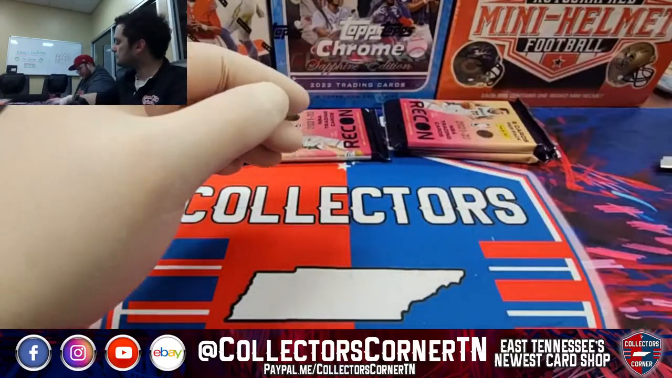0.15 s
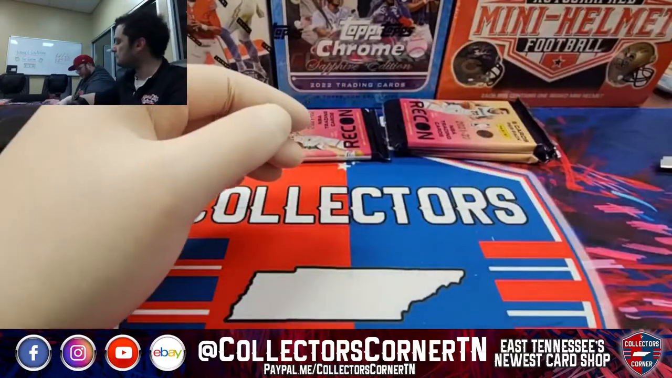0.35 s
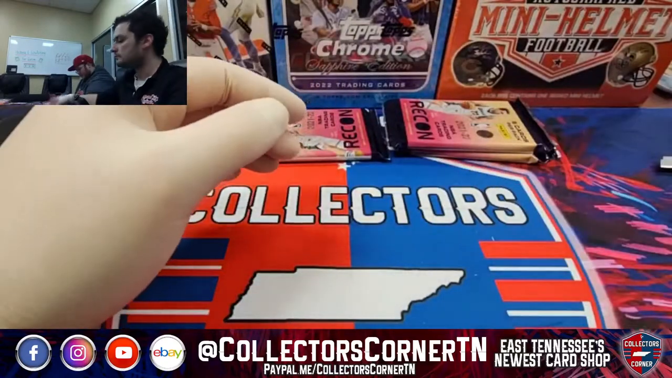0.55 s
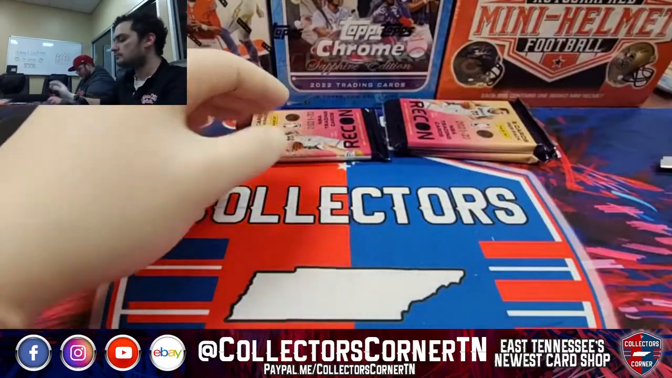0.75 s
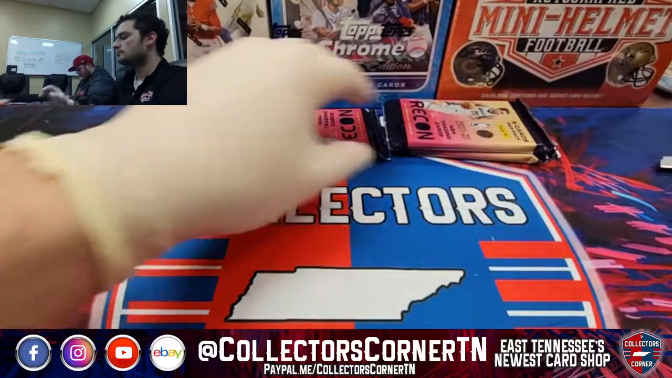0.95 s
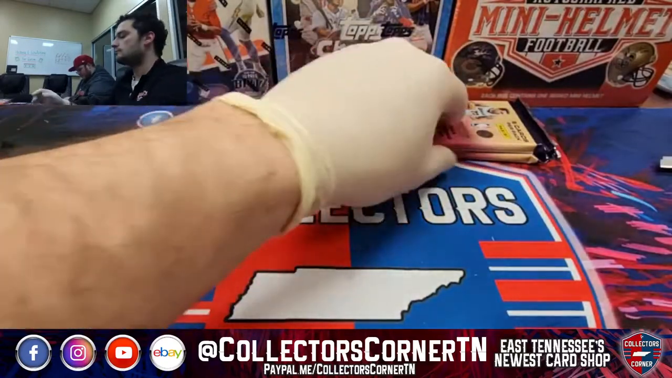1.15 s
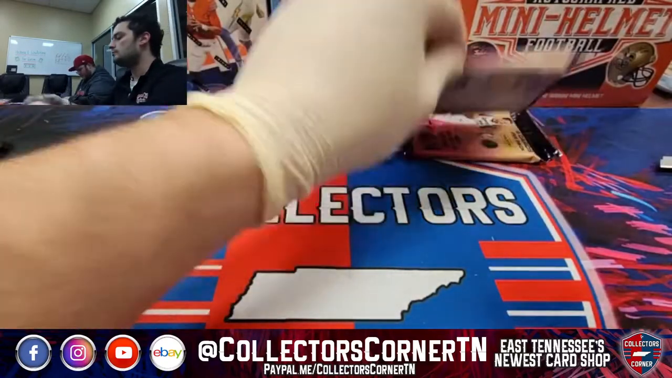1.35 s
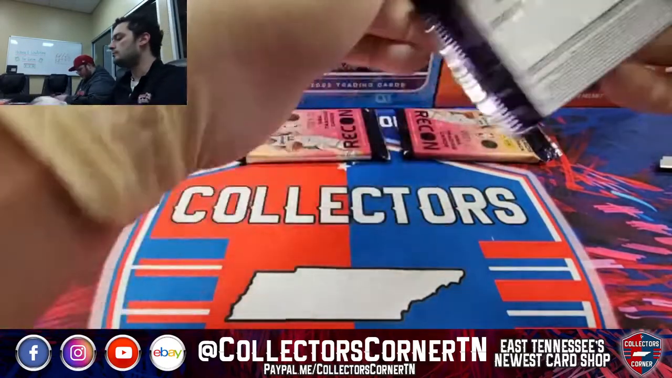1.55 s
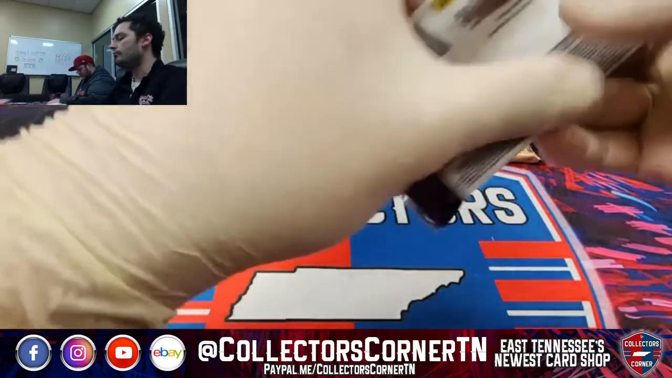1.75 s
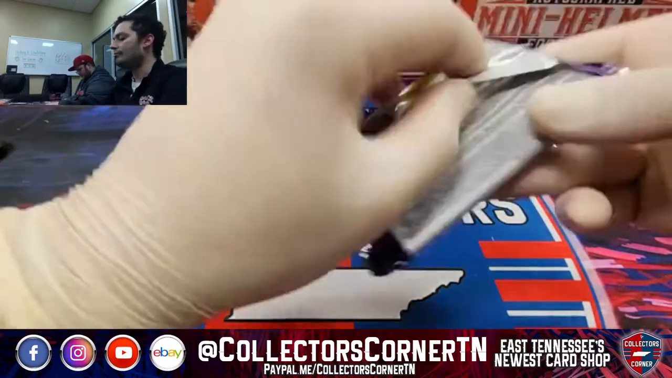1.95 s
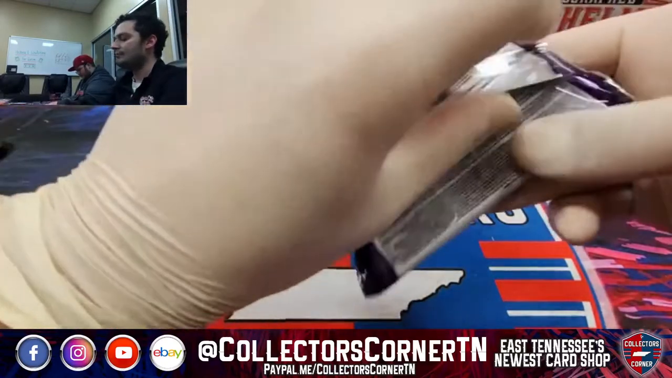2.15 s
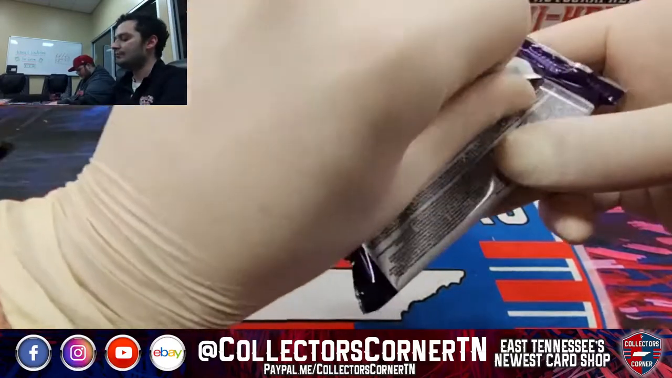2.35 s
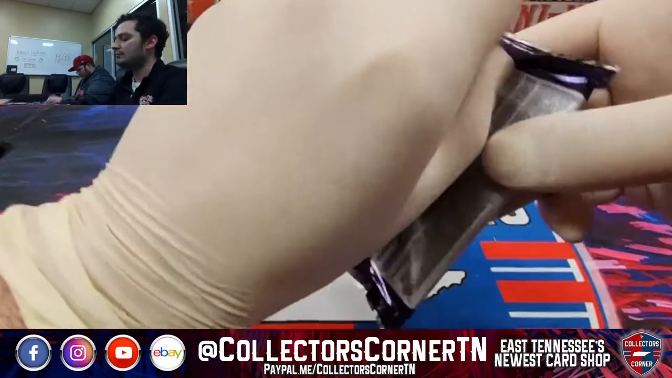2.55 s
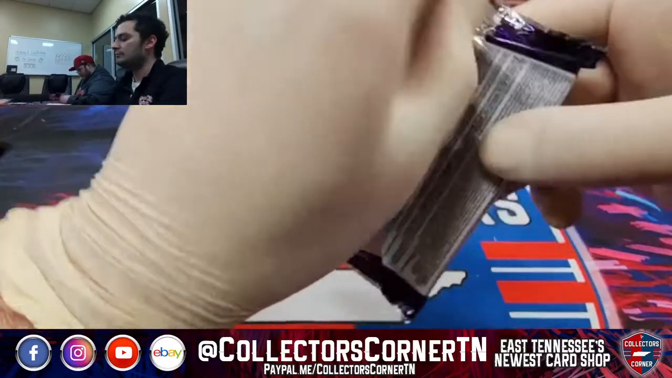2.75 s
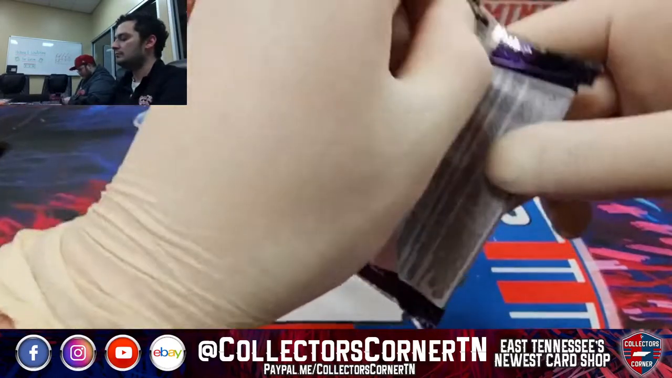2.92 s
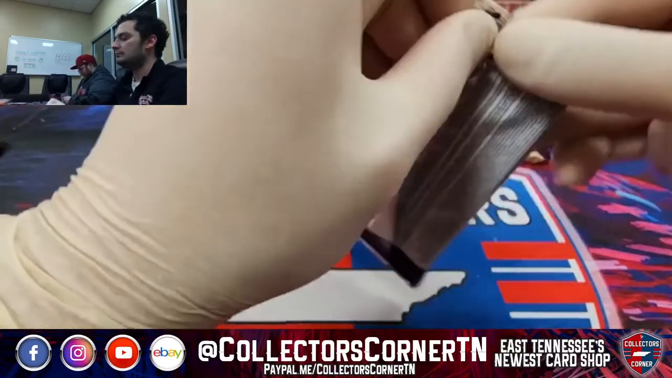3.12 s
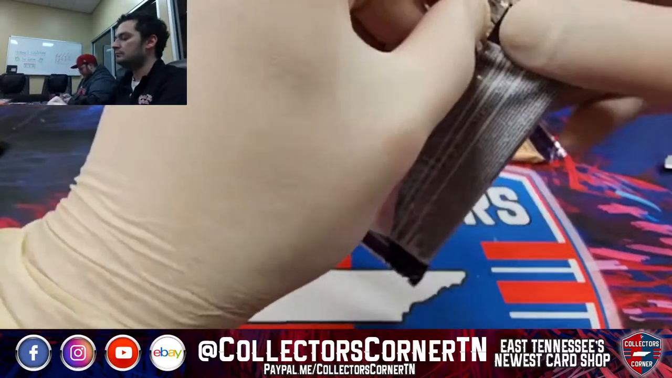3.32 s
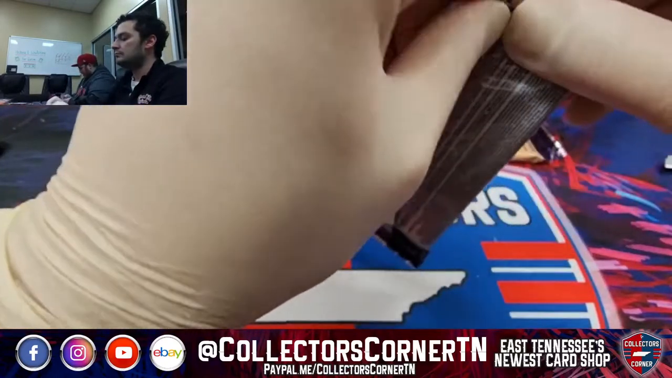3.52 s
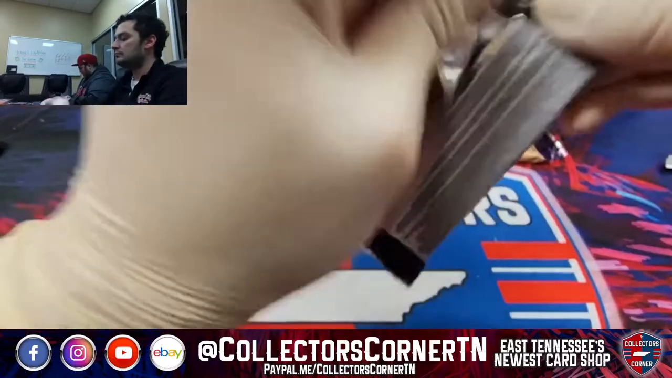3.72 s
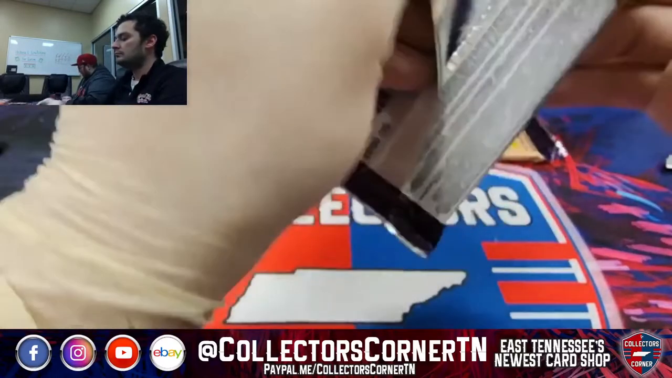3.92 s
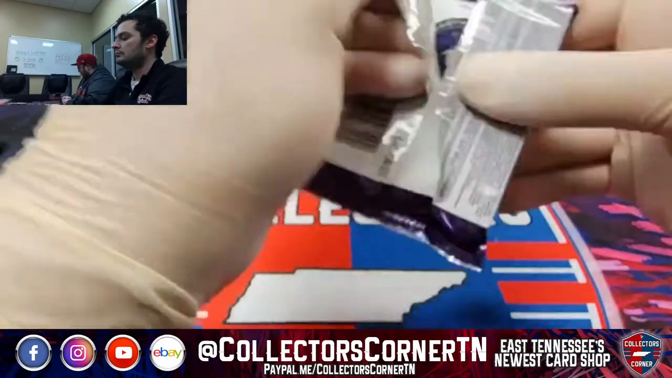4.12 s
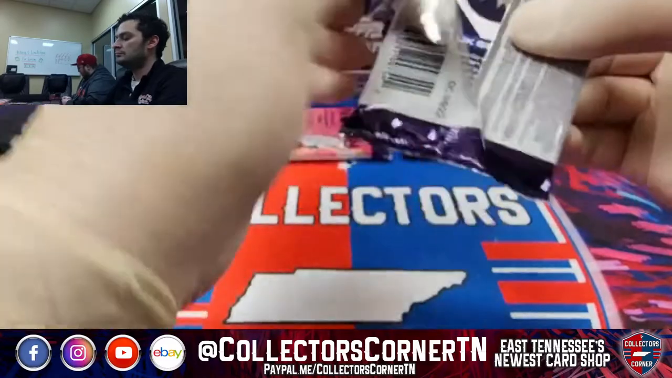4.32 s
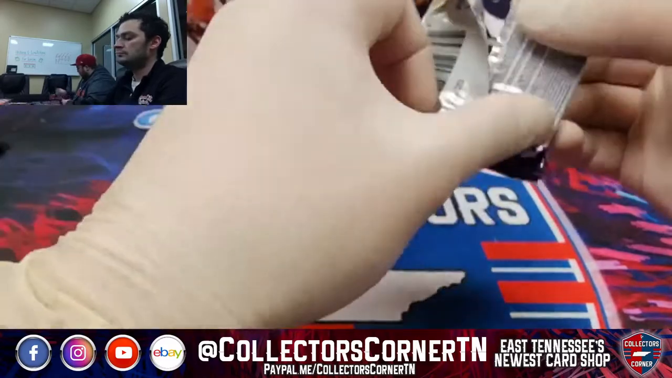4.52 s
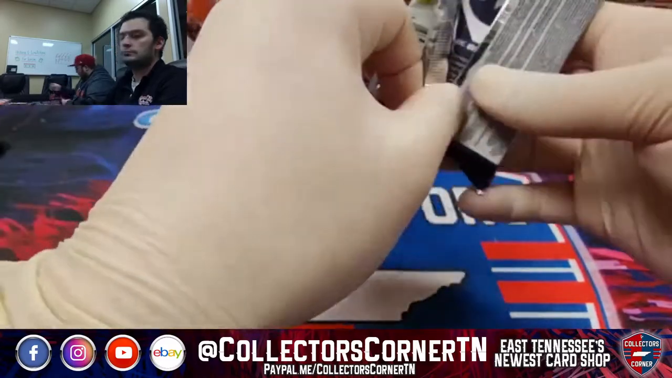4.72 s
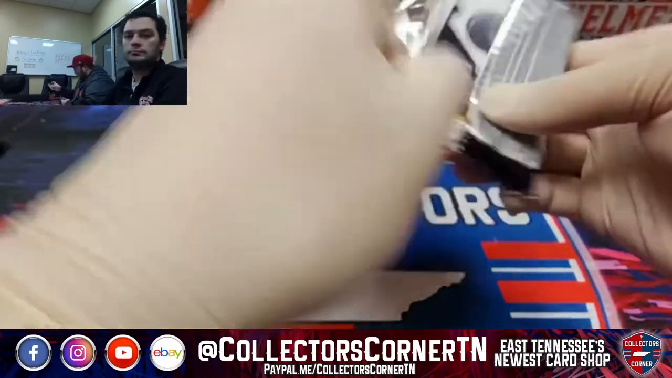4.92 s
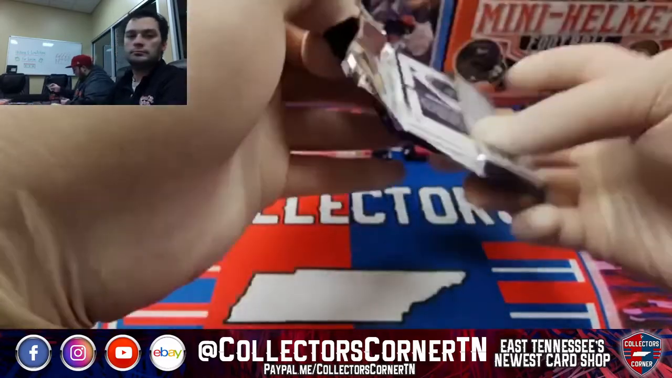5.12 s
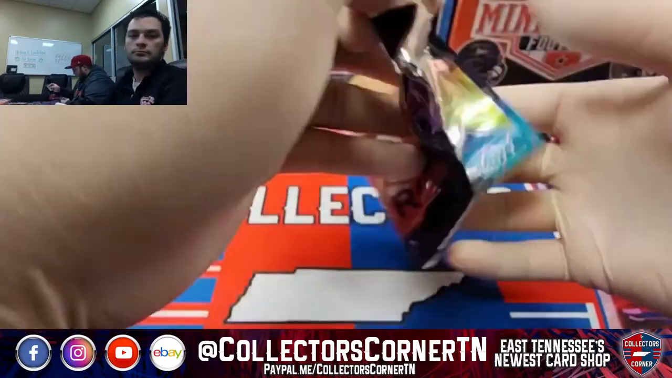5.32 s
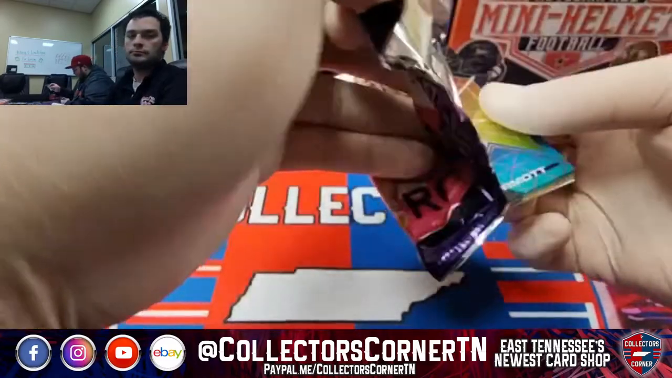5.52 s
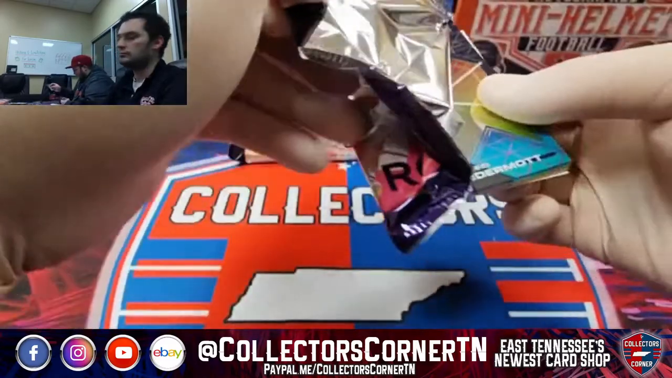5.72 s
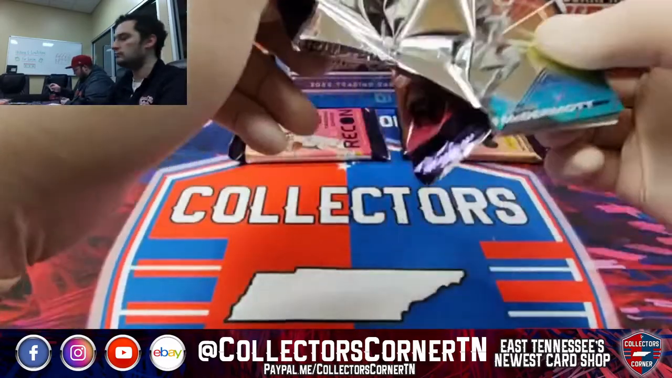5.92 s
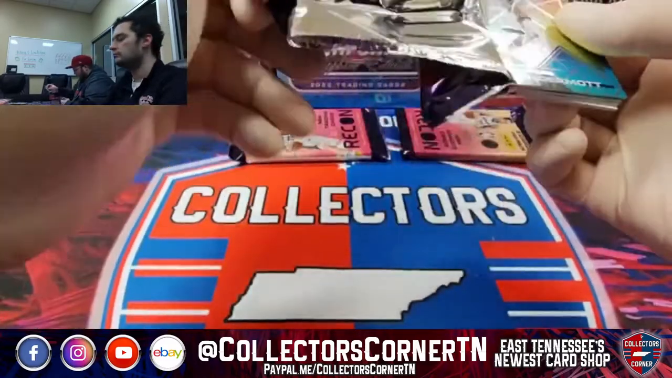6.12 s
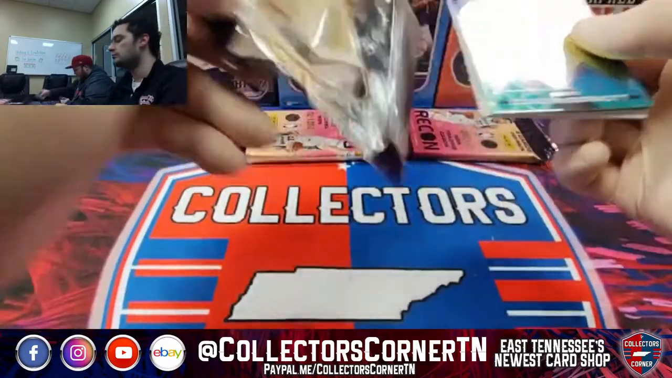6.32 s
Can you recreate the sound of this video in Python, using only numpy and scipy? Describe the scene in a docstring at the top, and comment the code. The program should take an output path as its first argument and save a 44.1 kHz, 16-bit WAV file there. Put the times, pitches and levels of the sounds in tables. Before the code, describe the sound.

Gloved hands tear open and crinkle a foil packet in dense, sharp crackles and loud snaps, over a faint airy fan hum in a quiet room.

```python
"""A quiet room: gloved hands pick up a foil pack, tear it open and crinkle it close to a microphone.
Creases snap as bright fizz plus a sagging ring; tiny creases rustle as band-wise grains of noise.
The seam zips as rapid slips into resonances; the pack's body pops and soft knocks sound as short tones.
A fan hisses as coloured noise and hums in wavering sines; random taps form the room's echo.
The microphone overloads at the loudest snaps: one-way clicks and a lopsided clip."""
import sys
import numpy as np
from scipy import signal
from scipy.io import wavfile
from scipy.ndimage import uniform_filter1d

SR = 44100
rng = np.random.default_rng(int(sys.argv[2]) if len(sys.argv) > 2 else 0)


def file_out(sig):
    """Save sig as 16-bit WAV at sys.argv[1]."""
    # one column per channel
    cols = np.atleast_2d(sig).T
    # limit, then scale
    lim = np.clip(cols, -1, 1)
    pcm = np.round(lim * 32767).astype(np.int16)
    wavfile.write(sys.argv[1], SR, pcm)


N = 285327


def gain_of(db):
    """Decibels to amplitude gain."""
    return 10 ** (np.asarray(db) / 20)


def evened(x):
    """Scales to rms 1."""
    return x / np.sqrt(np.mean(x ** 2) + 1e-20)


def read(points, hz):
    """Interpolates (hz, value) points on a log frequency axis."""
    point_hz, value = np.transpose(points)
    return np.interp(np.log(hz + 1), np.log(point_hz + 1), value)


def add(mix, start_s, sound):
    """Mixes a sound in at start_s, cut at the end of the mix."""
    part = mix[round(start_s * SR):][:len(sound)]
    part += sound[:len(part)]


def resonate(x, hz, width_hz):
    """Two-pole resonance with peak gain 1."""
    return signal.lfilter(*signal.iirpeak(min(hz, .45 * SR), hz / width_hz, SR), x)


def high_pass(x, hz):
    """Steep bass cut: thin foil gives no bass."""
    return signal.sosfilt(signal.butter(8, hz, "high", fs=SR, output="sos"), x)


def low_pass(x, hz):
    """Steep linear-phase band limit."""
    return signal.oaconvolve(x, signal.firwin(511, hz, window=("kaiser", 9), fs=SR), "same")


def coloured(x, points, size):
    """Gives x a spectrum frame by frame; returns bin hz, frame s, frames."""
    hz, t_s, frames = signal.stft(x, SR, nperseg=size)
    return hz[:, None], t_s, frames * gain_of(read(points, hz))[:, None]


LEAD_S = .008  # time before the flip


def snap(ring_db, ring_hz, fizz_db, length_ms, noise):
    """A crease flips: bright fizz leads the panel's ring, which sags in pitch."""
    t_s = np.arange(len(noise)) / SR - LEAD_S
    u = np.maximum(t_s, 0) / (length_ms / 1000)

    # single noise samples vary each crease's colour and phase
    fizz_hz = 12000 * np.exp(0.22 * np.tanh(noise[1]))
    fizz = resonate(high_pass(noise, 9750), fizz_hz, 10600)
    upper_hz = ring_hz * (1.49 + 0.16 * np.tanh(noise[2]))
    blur = resonate(noise[::-1], ring_hz, 1400) + .5 * resonate(noise[::-1], upper_hz, 1600)
    cycles = np.cumsum(ring_hz * (1 + 0.1519 * np.exp(-u / 0.12))) / SR
    clear = np.exp(-length_ms / 2.24)  # a long snap is several flips, which blur the ring
    tone = np.sin(2 * np.pi * cycles + noise[0])
    ring = np.sqrt(2 * clear) * tone + np.sqrt(1 - clear) * evened(blur)

    halo = .03 * np.exp(-abs(t_s) / .002)  # faint halo around the flip
    fits = evened(uniform_filter1d(np.roll(noise, len(noise) // 2), 20))
    jerks = np.exp(0.29 * fits - .2)  # the flip goes in fits

    def shape(rise, fall):
        return jerks * np.sqrt(2) * (1 - np.exp(-u / rise)) ** 2 * np.exp(-(u / fall) ** 2) + halo

    ring = high_pass(ring * shape(0.17, 0.75), min(3300, 0.74 * ring_hz))
    fizz = high_pass(evened(fizz) * shape(0.1, 0.52), 3000)
    return gain_of(ring_db) * ring + gain_of(fizz_db) * fizz


# crimped edge ticking open: start_s, end_s, ticks_per_s, start_fizz_db, end_fizz_db
EDGE_TICKS = (5.4725, 5.508, 240, -21, -23)
TICK_RING_HZ, TICK_RING_REL_FIZZ_DB, TICK_MS = 4300, -18, 2.0


def ratchet():
    """Evenly spaced, fading ticks of a crimped edge, as snap rows."""
    start_s, end_s, per_s, db0, db1 = EDGE_TICKS
    rows = []
    for s in np.arange(start_s, end_s, 1 / per_s):
        fizz_db = np.interp(s, (start_s, end_s), (db0, db1))
        rows.append((s, fizz_db + TICK_RING_REL_FIZZ_DB, TICK_RING_HZ, fizz_db, TICK_MS))
    return rows


LESSER_PER_S, LESSER_SPREAD_DB = 45, 8
LESSER_RING_REL_DB, LESSER_FIZZ_REL_DB = 6, 6  # over the squeeze's level
LESSER_LOW_HZ, LESSER_HIGH_HZ, LESSER_MID_MS = 3790, 7550, 3.66


def lesser_snaps():
    """Random snap rows: up to ten creases flip in a squeeze, at levels that follow it."""
    rows = []
    squeeze_draws = rng.random((len(SQUEEZES), 10, 6))
    for (start_s, end_s, db0, db1, dull_db), draws in zip(SQUEEZES, squeeze_draws):
        for k, (at, ring, fizz, tone, size, spare) in enumerate(draws):
            if k + spare >= LESSER_PER_S * (end_s - start_s):
                continue
            db = db0 + at * (db1 - db0)
            ring_db = db + dull_db + LESSER_RING_REL_DB + LESSER_SPREAD_DB * (2 * ring - 1)
            ring_hz = LESSER_LOW_HZ * (LESSER_HIGH_HZ / LESSER_LOW_HZ) ** tone
            fizz_db = db + LESSER_FIZZ_REL_DB + LESSER_SPREAD_DB * (2 * fizz - 1)
            length_ms = LESSER_MID_MS * 2 ** (2 * size - 1)
            rows.append((start_s + at * (end_s - start_s), ring_db, ring_hz, fizz_db, length_ms))
    return rows


# clear crease snaps, levels of the wave crests: start_s, ring_db, ring_hz, fizz_db, length_ms
CLEAR_SNAPS = [(1.161, -65, 7900, -52, 3), (1.2266, -43, 3540, -37, 3.9), (1.4871, -35, 6770, -26, 1.9),
               (1.4948, -23, 7500, -29, 4.2), (1.717, -43, 7960, -38, 3.5), (1.795, -24.5, 3550, -54, 2.6),
               (1.8038, -17.5, 3520, -13.5, 1.4), (1.855, -14, 6600, -29, 1.2),
               (1.8874, -19, 4170, -42, 1.7), (1.8997, -22, 6100, -40, 1.4), (1.9396, -20, 4200, -41, 5),
               (1.9773, -16, 4500, -38, 0.83), (2.0012, -24, 7080, -33, 1.5), (2.0243, -5, 4070, -35, 1.23),
               (2.078, -32, 7500, -51, 2.8), (2.1122, -4.5, 4105, -10, 1.3), (2.116, -6.5, 4310, -33, 1.4),
               (2.137, -14, 4140, -13, 1.4), (2.1936, -15, 4610, -18, 1.1), (2.209, -25, 6200, -33, 1.8),
               (2.2386, -28.5, 7800, -24, 3.2), (2.2994, -10, 5650, -16, 2.44),
               (2.332, -19, 7800, -16, 1.9), (2.3442, -24, 7060, -24, 1.8), (2.376, -36, 7500, -24, 2.3),
               (2.4162, -10.5, 6840, -12, 3.3), (2.4793, -20, 6800, -36, 3.4),
               (2.5198, -21.5, 3630, -23.5, 3), (2.5291, -23.5, 6960, -38, 5.2),
               (2.5952, -20, 4350, -26, 8.5), (2.6387, -14, 7100, -9.5, 2.3),
               (2.651, -17.5, 4440, -16, 9.5), (2.6772, -12.5, 4110, -11.5, 7.7),
               (2.701, -26.5, 6930, -19, 6.6), (2.8044, -23, 7160, -33, 4.5),
               (2.8466, -18.5, 6200, -16, 3.7), (2.9657, -19.5, 6170, -39, 3.2),
               (2.977, -14.5, 7490, -18.5, 2.3), (3.001, -26, 4740, -31, 3.6),
               (3.1284, -7.5, 5380, -1.5, 1.57), (3.14, -23, 7500, -25, 2.4),
               (3.1683, -19.5, 4430, -18, 2.6), (3.223, -44, 2770, -30, 2.2),
               (3.2319, -26.5, 7230, -28, 4.7), (3.358, -25.5, 6940, -48, 3.8),
               (3.4484, -37, 7800, -27, 3.4), (3.4787, -19.5, 7080, -16.5, 3.1),
               (3.4855, -21.5, 6260, -34, 2.9), (3.4984, -24, 4600, -17, 2.4),
               (3.5255, -24, 4750, -15, 2.9), (3.5347, -22, 5660, -25, 4.4), (3.5417, -25, 6260, -32, 1.9),
               (3.55, -22.5, 6010, -36, 3.1), (3.6202, -6.5, 6120, -5.5, 6.5),
               (3.6381, -7.5, 6000, -2, 1.9), (3.65, -12, 5000, -7, 2.6), (3.6752, -14, 5270, -20, 5.3),
               (3.682, -20, 5940, 3, 0.95), (3.6992, -17, 4700, -6, 2), (3.7365, -23, 6240, -21, 2.3),
               (3.7473, -23, 7200, -17.5, 4.4), (3.753, -21.5, 5920, -14, 7.5),
               (3.766, -21, 7000, -12, 3.2), (3.799, -12.5, 7240, -0.5, 1.4), (3.801, -12.5, 3047, -19, 3),
               (3.8554, -28.5, 5670, -26, 5.2), (3.8731, -24, 5430, -33, 2.3),
               (3.9864, -17, 3280, -16, 1.8), (4.037, -20, 5760, -22, 3.2), (4.069, -31, 6240, -33, 4.5),
               (4.0828, -15.5, 5770, -1.5, 1.5), (4.089, -21.5, 6000, -11, 2.7),
               (4.1089, -20, 4260, -16.5, 6.2), (4.154, -21, 4050, -9, 1.23),
               (4.219, -40, 6000, -30.5, 6.2), (4.2692, -37.5, 3560, -31, 2.5),
               (4.5114, -26, 5210, -25, 2.7), (4.5725, -16, 2800, -21, 2.5), (4.5887, -11, 3443, -16, 2.9),
               (4.6068, -18, 3440, -32, 0.87), (4.621, -17, 7160, -11, 3.8), (4.6342, -30, 7360, -20, 1.9),
               (4.651, -30.5, 3930, -25, 4), (4.7187, -9.5, 5150, -14, 2), (4.7358, -11, 3160, -39, 2.4),
               (4.7556, -16.5, 3850, -21, 4.6), (4.809, -17.5, 4910, -27, 6.8),
               (4.8316, -12, 4900, -27, 3.6), (4.844, -10, 3394, -26, 1), (4.865, -18, 3800, -9.5, 7.6),
               (4.8726, -9, 3430, -5.5, 7.3), (4.904, -21.5, 3730, -13.5, 4),
               (4.963, -28.5, 5300, -29, 2.7), (5.019, -37, 6000, -32, 2.85),
               (5.0682, -29, 4870, -17.5, 1.52), (5.0982, -18.5, 3880, -11.5, 6.1),
               (5.118, -19, 4500, -30, 2.2), (5.16, -27.5, 5620, -26, 1.5), (5.18, -33.5, 3960, -30, 4.3),
               (5.2127, -40, 7900, -25, 8.3), (5.2635, -21.5, 7950, -18.5, 3.7),
               (5.3593, -12.5, 4200, -40, 1.32), (5.3837, -29, 4400, -53, 2.5),
               (5.4483, -25, 6750, -12.5, 2.5), (5.4657, -25.5, 3880, -29, 3.6),
               (5.5275, -29, 2830, -28, 2.3), (5.5338, -25, 4060, -14, 4.4), (5.561, -48, 5490, -19, 2),
               (5.6046, -41, 2800, -21.5, 4.1), (5.609, -35.5, 2540, -23, 2.7),
               (5.6417, -45, 7990, -17, 1.2), (5.6511, -24, 6120, -35, 2.1),
               (5.6613, -9.5, 3830, -2.5, 4.2), (5.7063, -21.5, 6950, -18, 2.9),
               (5.7271, -19, 7600, -17, 2.5), (5.7332, -10, 4680, -7, 3.8), (5.777, -28, 4420, -28, 4.4),
               (5.9028, -27, 5300, -18, 2.1), (5.909, -13.5, 4790, -23, 2.6),
               (5.9486, -27.5, 7450, -22.5, 6.5), (6.024, -32.5, 7100, -28, 3.8),
               (6.1654, -36, 7990, -20.5, 1.8), (6.2025, -22, 3670, -22, 1.26),
               (6.2099, -18, 3640, -34, 5.4), (6.2237, -14.5, 3690, -21, 2.96),
               (6.4396, -22.5, 7670, -24, 3.14)]


def snaps():
    """All flipping creases: clear ones, edge ticks and lesser ones."""
    mix = np.zeros(N)
    for s, *row in CLEAR_SNAPS + ratchet() + lesser_snaps():
        add(mix, s - LEAD_S, snap(*row, rng.standard_normal(1100)))
    return mix


def grains(hz, per_s, length):
    """Noise bursts around hz at random moments, a few large, over faint steady hiss; length in samples."""
    size = gain_of(4.23 * np.minimum(rng.exponential(1, N), 4)) * (rng.random(N) < per_s / SR)
    bursts = signal.oaconvolve(size, signal.windows.hann(round(length)))[:N]
    hiss = .1
    return evened(resonate((bursts + hiss) * rng.standard_normal(N), hz, 0.89 * hz))


# squeezes setting off small creases: start_s, end_s, start_db, end_db, dull_db
# dull_db: creases under 8 kHz relative to the bright ones
SQUEEZES = [(1.205, 1.261, -73, -51, -3), (1.492, 1.563, -36, -59, -1.5), (1.712, 1.77, -55, -51, -1),
            (1.801, 1.919, -35, -44.5, 1), (1.928, 2.057, -35, -38.5, -1), (2.096, 2.17, -28.5, -37.5, 1),
            (2.179, 2.279, -42, -46.5, -1), (2.294, 2.368, -36.5, -36, -1.5), (2.417, 2.458, -34, -44, -1),
            (2.477, 2.548, -34.5, -39.5, -1), (2.56, 2.595, -50, -46, -2), (2.595, 2.725, -33.5, -34, -2.5),
            (2.801, 2.882, -36.5, -44, -4.5), (2.94, 3.031, -47, -47, -3), (3.128, 3.257, -49, -50, -5),
            (3.27, 3.333, -46, -56, -10), (3.476, 3.589, -47, -43, -2), (3.62, 3.718, -11.5, -25, -2.5),
            (3.728, 3.815, -25.5, -34.5, -1.5), (3.795, 3.885, -37.5, -46, -2), (3.973, 4.08, -52, -39, -5),
            (4.08, 4.175, -21, -44.5, -1), (4.187, 4.268, -43, -64, -4), (4.512, 4.57, -48, -62, -3),
            (4.571, 4.681, -30, -54, 1.5), (4.686, 4.722, -54, -52, -3), (4.716, 4.799, -32.5, -32, 2),
            (4.8, 4.863, -29.5, -23, 0), (4.872, 4.954, -15, -38, -2.5), (4.964, 5.065, -50, -65, 1),
            (5.065, 5.134, -45, -31, 5), (5.15, 5.229, -56, -36, -4), (5.261, 5.392, -48, -49, -11),
            (5.455, 5.515, -31, -48, -4), (5.53, 5.625, -33.5, -63, -6), (5.627, 5.721, -45, -34.5, -2),
            (5.728, 5.799, -25.5, -55, 0.5), (5.883, 5.985, -47, -45, -1.5), (6.02, 6.18, -65, -48, -5),
            (6.192, 6.275, -27.5, -44.5, -1.5)]
# foil crease colour: freq_hz, density_db (per Hz)
FOIL_COLOUR = [(2000, -51), (2800, 4.5), (3400, 6.5), (4500, 8), (6000, -1), (8500, 2), (11000, -0.5),
               (15500, 8)]
# body scuffle colour: centre_hz, level_db
BODY_BANDS = ((300, -10.5), (550, -4.5), (1000, -2.5), (1600, -5.5), (2300, 6.0))
SCUFFLE_DB, SCUFFLE_GROWTH = -18.5, 0.8  # level: offset plus this share of the squeeze's start_db
PATCHY_DB = 4.5  # rms colour drift as the foil changes shape


def rustle():
    """Random tiny creases, separate grains per band, over the dull scuffle of the pack's body."""
    bands_hz = np.geomspace(3000, 14000, num=7)
    creases = sum(grains(hz, 420, 34.2) * np.sqrt(hz) for hz in bands_hz)
    frames = coloured(creases, FOIL_COLOUR, size=128)[2]
    patches = uniform_filter1d(rng.standard_normal(frames.shape), size=4, axis=0)
    patches = evened(uniform_filter1d(patches, size=24, axis=1))
    creases = signal.istft(frames * gain_of(PATCHY_DB * patches), SR, nperseg=128)[1][:N]
    creases = evened(creases)
    bright = signal.sosfiltfilt(signal.butter(2, 8000, "high", fs=SR, output="sos"), creases)
    body = sum(gain_of(db) * resonate(grains(hz, 600, 150), hz, hz) for hz, db in BODY_BANDS)

    bright_level, dull_level, body_level = np.zeros((3, N))
    for start_s, end_s, db0, db1, dull_db in SQUEEZES:
        n = round((end_s - start_s) * SR)
        edge = np.minimum(np.arange(n) / 40, np.arange(n)[::-1] / 400)
        edge = np.minimum(edge, 1)  # sudden start, softer end
        level_db = np.linspace(db0, db1, n)
        body_db = SCUFFLE_DB + SCUFFLE_GROWTH * db0 + level_db - db0
        add(bright_level, start_s, edge * gain_of(level_db))
        add(dull_level, start_s, edge * gain_of(dull_db + level_db))
        add(body_level, start_s, edge * gain_of(body_db))
    return bright * bright_level + (creases - bright) * dull_level + evened(body) * body_level


# resonances the slips ring: freq_hz, width_hz, level_db
SEAM_MODES = [(3570, 150, 17), (4330, 170, 8.5), (5700, 300, 0), (7000, 370, -13), (11400, 3400, -17)]


def seam(x):
    """The stretched seam's resonances in parallel, without bass."""
    return high_pass(sum(gain_of(db) * resonate(x, hz, width_hz) for hz, width_hz, db in SEAM_MODES), 4070)


def zip_up(start_s, end_s, db0, db1, rate0, rate1):
    """Quick, uneven slips and some scrape ring the stretched seam."""
    n = round((end_s - start_s) * SR)
    wander = uniform_filter1d(rng.standard_normal(n), 30)
    rate = np.linspace(rate0, rate1, n) * (1 + 0.5 * wander)
    slips = np.diff(np.floor(np.cumsum(rate) / SR), prepend=0)
    slips = slips * gain_of(0.83 * rng.standard_normal(n))
    drive = slips * np.sqrt(SR / rate0) + .5 * rng.standard_normal(n)
    drive = np.pad(drive * gain_of(np.linspace(db0, db1, n)), (0, 300))  # room to ring out
    return seam(drive) / np.std(seam(rng.standard_normal(4000)))


# seam peeling: start_s, end_s, start_db, end_db, start_slips_per_s, end_slips_per_s
PEELS = [(1.837, 1.853, -30, -25.5, 800, 800), (2.084, 2.109, -31.5, -14.5, 1660, 1180),
         (2.492, 2.5, -34, -24.5, 1200, 1100), (4.848, 4.869, -42, -21, 760, 1200),
         (6.218, 6.228, -24, -23.5, 1800, 1100)]


def zips():
    """The seam peels in fast slips."""
    mix = np.zeros(N)
    for row in PEELS:
        add(mix, row[0], zip_up(*row))
    return mix


def pop(level_db, hz, length_ms, noise, rough_share):
    """A soft push: a few cycles, roughened by narrow noise."""
    t_s = np.arange(len(noise)) / SR
    rough = resonate(resonate(resonate(noise, hz, hz), hz, hz), hz, hz)
    wave = np.sin(2 * np.pi * hz * t_s) + rough_share * evened(rough)
    u = t_s / (length_ms / 1000)
    swell = np.exp(-((u - .4) / np.where(u < .4, .2, .45)) ** 2)
    return gain_of(level_db) * wave * swell


# pack and cards flexing: start_s, level_db, pitch_hz
BODY_POPS = [(1.132, -50, 460), (2.214, -39.5, 620), (3.618, -28.5, 800), (3.64, -26, 1814),
             (3.656, -35, 1110), (3.676, -27.5, 1070), (3.697, -30, 970), (3.748, -30.5, 970),
             (3.766, -33, 890), (4.07, -34.5, 830), (4.081, -27.5, 800), (4.09, -24.5, 710),
             (4.106, -31.5, 676), (4.731, -39, 730), (4.763, -37, 880), (4.863, -23.5, 615),
             (4.866, -23, 320), (4.871, -23.5, 880), (4.882, -22, 1254), (4.901, -22.5, 1340),
             (4.917, -28, 1180), (4.961, -35, 684), (5.087, -34.5, 587), (5.101, -34, 412),
             (5.198, -39, 724), (5.481, -29.5, 570), (5.533, -43, 280), (5.661, -21.5, 720),
             (5.729, -28.5, 500), (5.906, -39, 698), (5.735, -39, 304), (6.211, -27.5, 588),
             (6.22, -31.5, 670)]


def pops():
    """The pack and cards flex in short rough pushes."""
    mix = np.zeros(N)
    for s, *row in BODY_POPS:
        add(mix, s, pop(*row, 7.1, rng.standard_normal(3000), rough_share=1.0))
    return mix


# soft hollow knocks away from the pack: start_s, level_db, pitch_hz, length_ms
SOFT_KNOCKS = [(.325, -51.5, 447, 20), (0.353, -42, 332, 32), (.366, -33, 276, 19), (.374, -39, 420, 16),
               (0.389, -41, 408, 19), (.410, -43, 384, 23), (4.371, -40.5, 595, 45), (4.43, -44, 627, 35)]


def knocks():
    """Soft hollow knocks: longer, smoother pushes than the pops."""
    mix = np.zeros(N)
    for s, *row in SOFT_KNOCKS:
        add(mix, s, pop(*row, rng.standard_normal(4000), rough_share=0.46))
    return mix


# clicks of the overloaded microphone: start_s, peak_db
OVERLOAD_CLICKS = [(2.1133, -39), (3.1285, -50), (3.62, -19), (3.8001, -18), (4.083, -20.5), (4.873, -28),
                   (5.662, -33), (5.734, -41)]


def overload_clicks():
    """One-way clicks of the overloaded microphone at the hardest snaps, half a millisecond, full-band."""
    mix = np.zeros(N)
    for s, db in OVERLOAD_CLICKS:
        add(mix, s, -gain_of(db) * signal.windows.hann(24))
    return mix


# decay per band: freq_hz, t60_s
ROOM_T60 = [(300, 0.28), (1000, 0.21), (4000, 0.15), (9000, 0.097), (16000, 0.11)]
# echo energy per band: freq_hz, level_db
ROOM_COLOUR = [(300, -7.5), (1000, -3.5), (4000, -14), (9000, -3.5), (16000, -9)]


def room(x):
    """Sparse taps of random sign, each band dying at its own speed; three tails take turns."""
    out = np.zeros(N)
    turn = 2 * np.pi * 9 * np.arange(N) / SR
    for k in range(3):
        taps = np.zeros(SR // 2)
        at = np.arange(130, SR // 2 - 10, 10)
        taps[at + rng.integers(0, 10, len(at))] = rng.choice([-1., 1.], len(at))
        taps[:470] *= .45  # faint near echoes until the first wall answers after 11 ms
        hz, t_s, frames = coloured(taps, ROOM_COLOUR, size=128)
        t60_s = read(ROOM_T60, hz)
        even = np.sqrt(10 * 2 * 3 * np.log(10) / (t60_s * SR))  # equal energy per band before colour
        tail = signal.istft(frames * even * gain_of(-60 * t_s / t60_s), SR, nperseg=128)[1]
        share = np.sqrt(2 / 3) * np.cos(turn + k * 2 * np.pi / 3)
        out = out + signal.oaconvolve(x * share, tail)[:N]
    return out


# air noise colour: freq_hz, density_db (per Hz)
FAN_COLOUR = [(30, -51), (60, -32), (120, -12.5), (200, -10.5), (300, -5), (600, -9), (1100, -5),
              (1500, -6.5), (2100, 0), (3100, -8.5), (4000, -7.5), (5500, -19), (8000, -26), (11000, -31.5),
              (16000, -37)]
# slow swell, hiss level in 1.5-2.5 kHz: time_s, level_db
FAN_SWELL = [(0.0, -58.5), (3.73, -50), (6.47, -51)]
# thin tones, rms before the swell: freq_hz, level_db
FAN_TONES = [(199.2, -72.5), (592.2, -77), (2202, -82), (2767, -69), (3763, -107), (8296, -90)]


def fan():
    """Air noise with drifting patches and thin wavering tones, both following a slow swell."""
    hz, _, frames = coloured(rng.standard_normal(N), FAN_COLOUR, size=2048)
    patches = uniform_filter1d(rng.standard_normal(frames.shape), 14, 0)
    patches = evened(uniform_filter1d(patches, 4, 1))
    frames = frames * gain_of(0.83 * patches)
    band = (hz[:, 0] > 1500) & (hz[:, 0] < 2500)
    air = evened(signal.istft(frames, SR, nperseg=2048)[1][:N])
    air = air * np.linalg.norm(frames) / np.linalg.norm(frames[band])  # rms 1 in the band

    t_s = np.arange(N) / SR
    swell_db = np.interp(t_s, *np.transpose(FAN_SWELL))
    tones = np.zeros(N)
    for tone_hz, db in FAN_TONES:
        waver = evened(uniform_filter1d(rng.standard_normal(N), 6000))  # 1 dB and 0.032 cycle rms
        wave = np.sin(2 * np.pi * (tone_hz * t_s + 0.032 * waver))
        tones = tones + np.sqrt(2) * gain_of(db + 1.0 * waver) * wave
    return air * gain_of(swell_db) + tones * gain_of(swell_db - swell_db[0])


def scene():
    """Pack and knocks with their room echo, the fan, and the microphone's overload clicks."""
    close = snaps() + rustle() + zips() + pops() + knocks()
    heard = close + room(close) + fan() + overload_clicks()
    return heard[None]


CAPSULE_HZ, EDGE_HZ = 15800, 16990


def record(dry):
    """The capsule's treble limit, a lopsided hard overload, then the band limit."""
    clipped = np.clip(low_pass(dry[0], CAPSULE_HZ), -.88, .84)
    return low_pass(clipped, EDGE_HZ)[None]


dry = scene()
out = record(dry)
file_out(out)
```